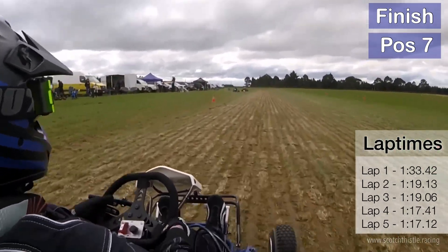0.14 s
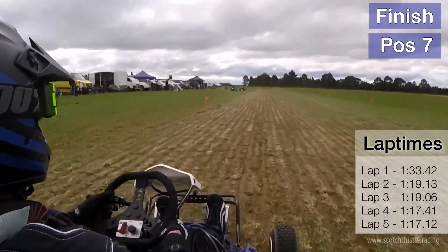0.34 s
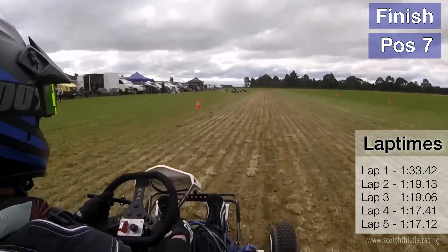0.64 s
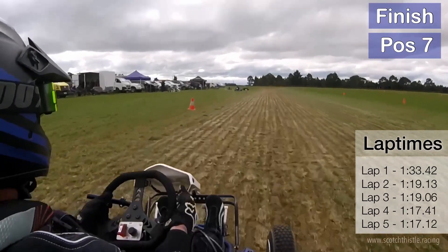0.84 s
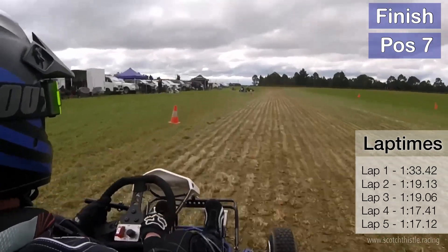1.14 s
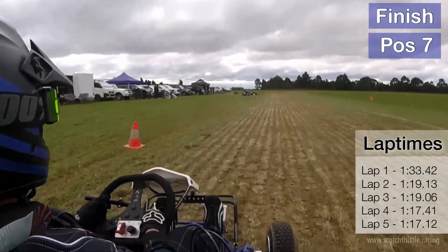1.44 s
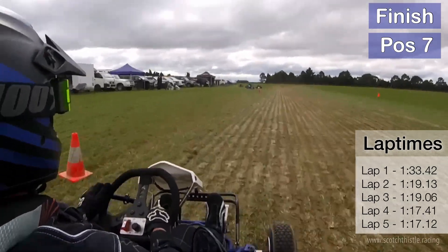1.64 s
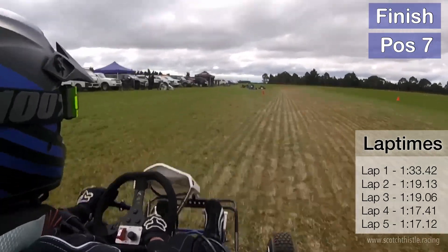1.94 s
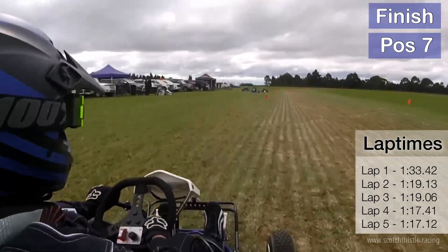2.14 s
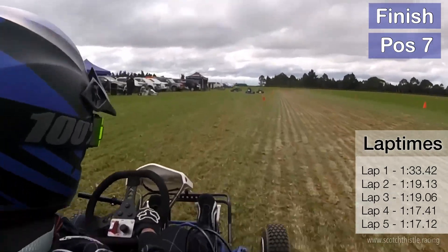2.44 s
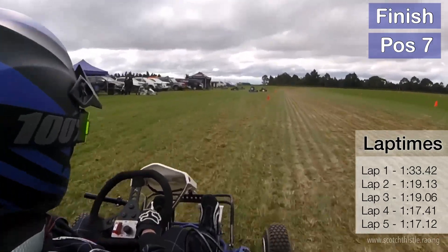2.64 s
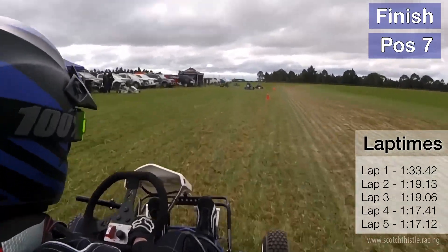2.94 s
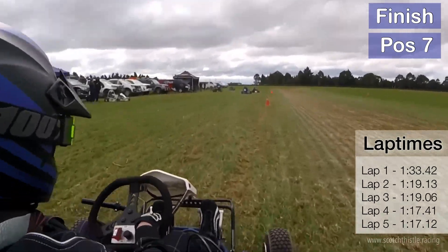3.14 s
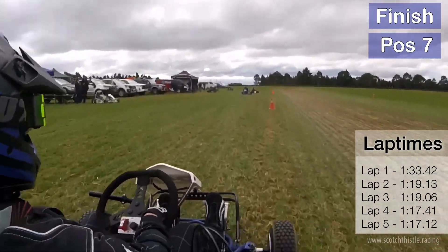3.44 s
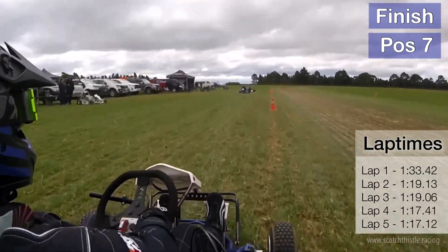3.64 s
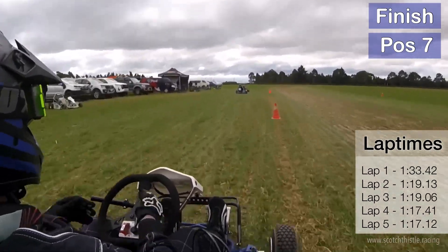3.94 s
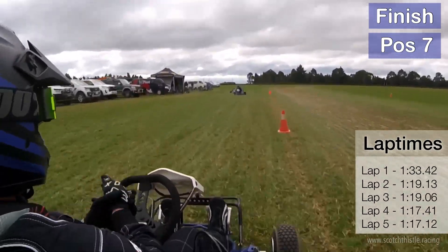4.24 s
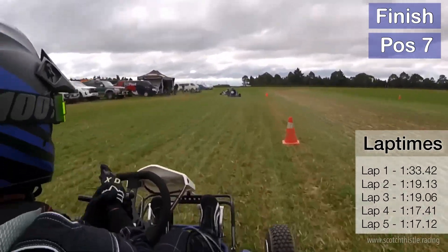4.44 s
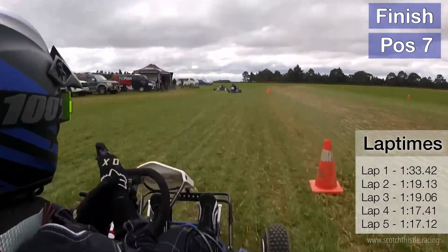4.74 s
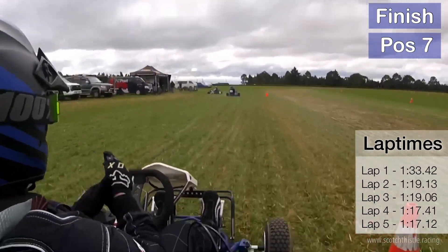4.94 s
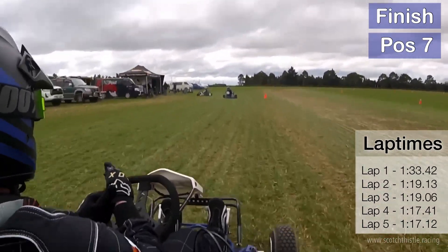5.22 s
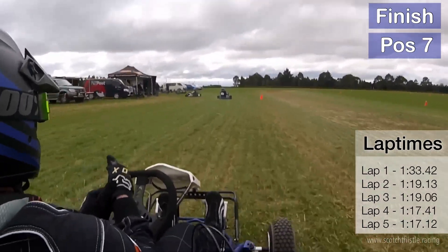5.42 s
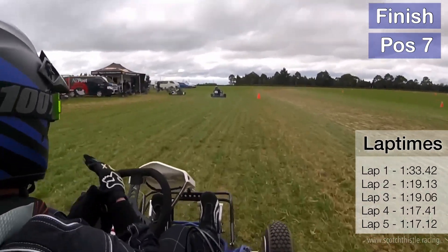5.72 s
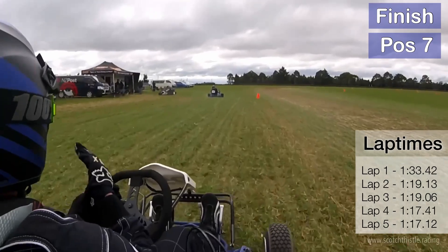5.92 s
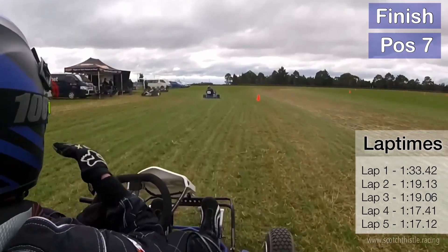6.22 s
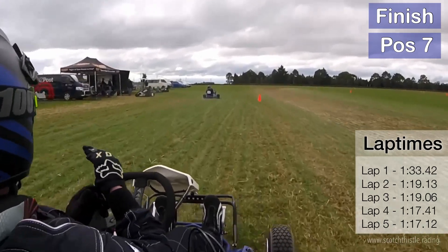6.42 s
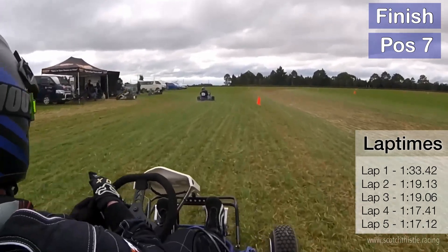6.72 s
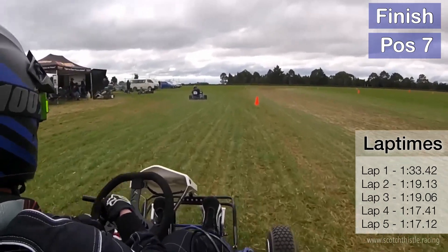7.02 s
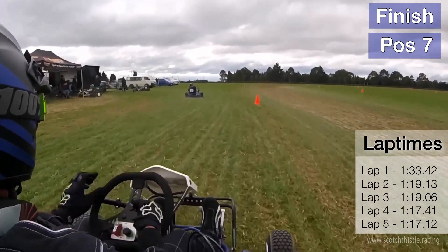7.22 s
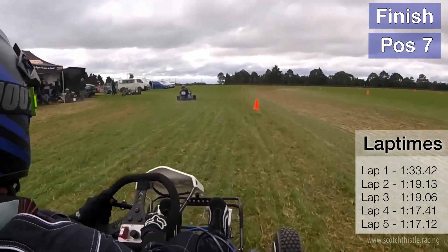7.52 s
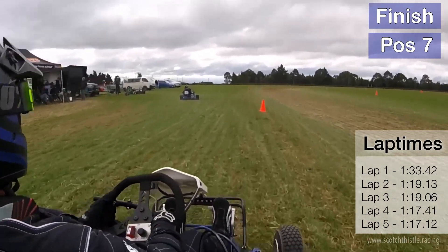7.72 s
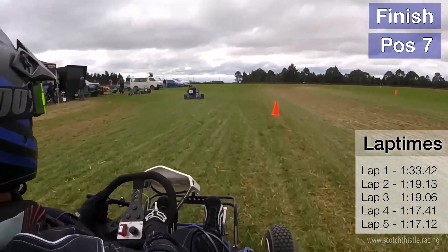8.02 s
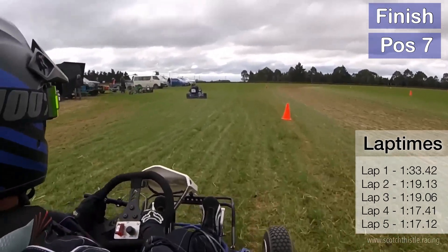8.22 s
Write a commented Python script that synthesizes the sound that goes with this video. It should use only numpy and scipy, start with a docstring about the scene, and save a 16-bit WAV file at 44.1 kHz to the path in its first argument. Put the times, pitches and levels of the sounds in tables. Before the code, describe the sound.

From 0 s a small single-cylinder kart engine runs in a low, coarse drone, close and dry in the open air. Heavy bass shaking throbs with each crank turn; the attached camera mount buzzes rapidly, and metal clatter and running chain fill the middle. Tyres swish faintly through stubble. Revs settle slowly until about 2.2 s, when a cluster of hard frame knocks leads into a quick jump in pitch, peaking at 2.4 s. Short chain scrapes follow at 2.4 and 2.7 s. The drone then snatches and wavers downward, pulsing around 3.5-4.5 s; a wheel thuds through a hollow at 4.7 s. From 5.4 s the load eases and the buzz recedes. By 6-8.4 s a lower, rough idle remains, with uneven bass sway, bright irregular chain clinks, ringing guard taps, chatter and turf rumble.

```python
"""A droning exhaust over mechanical clatter, on a shaking frame: a single-cylinder kart rolls over stubble and grass.
The crank swings the frame as a low sine, and the camera mount buzzes at both ends of each stroke.
The exhaust sums half orders of the crank and noisy puffs; filtered slaps and small contacts make the clatter.
The revs jump once, then sink to a rough idle: the slack chain clinks, its guard chatters and
the wheels rumble over the turf."""
import sys
import numpy as np
from scipy import signal
from scipy.fft import rfft, irfft, next_fast_len
from scipy.io import wavfile
from scipy.ndimage import uniform_filter1d, map_coordinates

SR = 44100
rng = np.random.default_rng(int(sys.argv[2]) if len(sys.argv) > 2 else 0)


def file_out(sig):
    """Save sig as 16-bit WAV at sys.argv[1]."""
    # one column per channel
    cols = np.atleast_2d(sig).T
    # limit, then scale
    lim = np.clip(cols, -1, 1)
    pcm = np.round(lim * 32767).astype(np.int16)
    wavfile.write(sys.argv[1], SR, pcm)


N = 369072
TIME = np.arange(N) / SR  # seconds

# Ground and wheels
# spectrum of the wheels' rumble on turf: (frequency [Hz], relative level [dB])
RUMBLE_SPECTRUM = [(12, -34.5), (26, -10.5), (38, -2), (55, -5.5), (70, -1), (88, 2), (110, -6), (135, -9),
                   (200, -16.5), (500, -43), (2000, -110)]
# spectrum of tyres in stubble: (frequency [Hz], relative level [dB])
SWISH_SPECTRUM = [(800, -6), (2500, 4.5), (3400, -5), (3900, -5.5), (5000, -5.5), (6000, -9), (8000, -20.5),
                  (10000, -29.5)]
# the wheels thud through a hollow: (time [s], length [s], level [dB])
HOLLOW = (4.7, 0.2, -43.5)
# ruts damp the shake and change the swish: (time [s], length [s], shake depth [dB], swish change [dB])
RUTS = [(0.326, .09, 6, 5.5), (0.464, 0.073, 10.5, 6.5), (.67, .055, 8, 1), (2.247, .03, 15.5, -2.5),
        (2.418, 0.093, 6, 1), (2.743, .025, 5, 1), (2.894, 0.055, 6.5, 10), (3.004, 0.031, 8, 8),
        (3.169, 0.047, 7.5, -1), (3.335, .04, 10.5, 3.5), (3.574, 0.083, 6.5, 3), (3.754, 0.058, 2.5, -0.5),
        (4.079, 0.055, 4, 8), (5.131, 0.078, 5, 3)]
# the frame knocks on bumps: (time [s], thump level [dB], ring [Hz])
KNOCKS = [(0.085, -22, 480), (2.1975, -26, 900), (2.2015, -19, 380), (2.2045, -21, 1300),
          (2.2075, -25, 450), (2.2195, -14.5, 640), (4.722, -18.5, 540), (5.581, -20.5, 600),
          (5.893, -23, 600)]
KNOCK_T60_S, CRACK_T60_S, CRACK_DB = 0.0087, 0.013, -14  # thump ring, crack ring, crack against thump

# Chain and its guard
# the chain scrapes as it takes up the drive: (time [s], length [s], level before a common trim [dB])
SCRAPES = [(2.43, 0.19, -32.5), (2.74, 0.086, -32.5)]
# spectrum of a scrape: (frequency [Hz], relative level [dB])
SCRAPE_SPECTRUM = [(500, -53), (1000, -7.5), (1550, -8.5), (1750, -0.5), (1950, -15.5), (3000, -25),
                   (6000, -37), (10000, -63.5)]
# spectrum of the chattering guard: (frequency [Hz], relative level [dB])
GUARD_SPECTRUM = [(500, -53), (1000, -25.5), (1180, 10.5), (1260, -11), (1360, 14), (1450, 1), (1600, 1),
                  (1850, -5.5), (2100, -59), (4000, -100)]
# the slack chain hits its guard: (time [s], peak before CLINK_GAIN_DB [dB], ring [Hz])
CLINKS = [(5.8396, -53, 5430), (5.8975, -51, 5300), (5.9628, -51.5, 4820), (6.1449, -52.5, 5280),
          (6.5071, -45, 5400), (6.55, -49, 5300), (6.6044, -48.5, 5470), (6.7022, -50, 5400),
          (6.8024, -51, 5200), (6.9007, -45, 5200), (6.9531, -48.5, 5440), (7.004, -49.5, 5370),
          (7.0584, -52, 6420), (7.0718, -44.5, 5380), (7.3272, -53, 5120), (7.4255, -48, 5600),
          (7.4374, -48, 5270), (7.5567, -46.5, 5130), (7.5727, -44, 5340), (7.6276, -48.5, 5160),
          (7.8451, -48.5, 5310), (7.9593, -43, 5200), (7.9698, -45, 5170), (8.1494, -49.5, 5330),
          (8.2023, -52, 4930), (8.2631, -45, 5170)]
# spectrum shared by clinks and jostling links: (frequency [Hz], relative level [dB])
CLINK_SPECTRUM = [(1500, -33.5), (4200, -19), (5200, 5), (5900, -3), (7200, -8.5), (8000, -21), (9000, -34)]
CLINK_S, CLINK_GAIN_DB = .0055, 5.5  # time scale of a link's skid; gain of every clink
CLINK_WIDTH_HZ, CLINK_LIFT_DB = 520, 7  # width and height of each clink's own ring
# the loose guard is tapped at idle: (time [s], strike level before the modes' levels [dB])
TAPS = [(6.0092, -37), (6.115, -37), (6.5334, -32.5), (6.8017, -28.5), (6.8366, -35), (6.928, -28.5),
        (6.9886, -32.5), (7.0462, -33), (7.264, -30.5), (7.3451, -30.5), (7.4381, -31), (7.7127, -30.5),
        (7.7443, -28.5)]
# ringing modes of the guard, varied a little at each tap: (frequency [Hz], level [dB], t60 [s])
GUARD_MODES = [(1190, -21.5, 0.032), (1360, -3.5, 0.062), (1420, -6, 0.028), (1850, -11, 0.027),
               (2800, -16, .012)]

# Clatter of the machinery
# resonances of engine block and frame: (frequency [Hz], width [Hz], lift [dB])
BODY = [(426, 110, 4.5), (643, 44, 3.5), (1190, 32, 4.5), (1320, 43, 5.5), (1664, 47, 5.5), (1837, 52, 8.5),
        (2140, 86, 4), (2803, 240, 4), (5216, 530, 13), (6330, 250, 7.5)]
# spectrum of the engine clatter: (frequency [Hz], relative level [dB])
CLATTER_SPECTRUM = [(90, -39.5), (200, -2.5), (330, -6), (450, -3.5), (750, -4.5), (1100, -8), (1600, -21),
                    (2500, -31), (5000, -57.5), (10000, -100)]
# spectrum of the running chain: (frequency [Hz], relative level [dB])
CHAIN_SPECTRUM = [(300, -51.5), (1000, -5), (1400, 1), (1800, 0), (2050, -4.5), (2400, -15), (3000, -12.5),
                  (3400, -22.5), (4500, -24.5), (6000, -32.5), (8000, -36), (10000, -45.5)]
# how hard the running kart rattles: (time [s], level [dB])
RATTLE = [(0, 1.5), (.45, 2), (1.9, 0), (3.1, -1), (3.5, 0.5), (4.5, -1.5), (5.1, -0.5), (5.75, -2.5),
          (6.5, -1.5), (7.6, 1.6), (8.37, 2)]
# brief dips in level: (time [s], length [s], depth [dB])
LULLS = [(5.281, 0.091, 3.5), (5.743, 0.19, 2.5)]
# jolts shake the rattle and the camera mount harder: (time [s], lift [dB])
JOLTS = [(.08, 2.5), (1.3, 3), (2.21, 5), (5.06, 1.5), (5.21, 1), (5.355, 1.5)]
JOLT_S, JOLT_SWING = 0.039, 0.72  # length of a jolt; dB of swing at the mount per dB of jolt
CRUISE_HZ = 82  # crank turns a second at which the level laws are stated
# level laws of four layers: (level at cruising speed [dB], slope [dB per dB of rattle],
# slope [dB per extra crank turn a second], change at idle [dB])
CLATTER_LAW = (-37.5, 1.08, 0.0932, 1)
CHAIN_LAW = (-43, 0.92, 0.1579, 3.5)
SWISH_LAW = (-60, 2, 0.3441, -5)
RUMBLE_LAW = (-39, 0.2, 0.3365, 8)
THROB_AT, FULL_SWING_DB = .4, -22  # share of a turn where the throb peaks; swing that gives full throb
CLATTER_THROB_DB, CHAIN_THROB_DB, IDLE_THROB_DB = 4.2, 2.2, .8  # swell per turn: driving adds to idle's

# Exhaust
# exhaust note: (multiple of the crank speed, level driving [dB], level idling [dB])
NOTE = [(.5, -51, -52.5), (1.5, -49.5, -37.5), (2, -42.5, -41), (2.5, -51.5, -40.5), (3, -46.5, -45.5),
        (3.5, -53.5, -53), (4, -56, -57.5), (4.5, -61, -53.5), (5, -63.5, -66), (6, -56.5, -47.5),
        (7, -58, -52.5)]
# the silencer's chamber resonances: (frequency [Hz], width [Hz], lift [dB])
SILENCER = [(190, 13, 3), (260, 21, 4.5), (307.4, 20, 5.5), (384, 21, 9.5)]
# spectrum of the gas puffs: (frequency [Hz], relative level [dB])
PIPE_SPECTRUM = [(60, -32), (110, -11), (160, 3.5), (230, 1), (300, -1.5), (420, -6), (700, -10),
                 (1500, -17.5), (3000, -48.5), (8000, -110)]
# the drone at twice the crank speed surges and drops as the drive snatches: (time [s], change [dB])
SURGES = [(2.36, -14), (2.48, 5), (2.6, 0), (2.74, 5.5), (3.2, -10), (3.39, 3.5), (3.55, 3), (5.25, -6),
          (5.45, -6)]
SURGE_S = 0.088
# then the drone pulses for a while: (time [s], length [s], pulses a second [Hz], depth [0-1])
LOPE = (3.85, .9, 6.35, .8)
FULL_HZ = 82.1  # below this crank speed the loaded exhaust fades
EXHAUST_DB, FADE_DB_PER_HZ = -0.05, 0.3
NOTE_WAVER_DB, CRANK_WAVER = 1.4, .002  # unsteadiness of each order; of the crank speed (share)

# Camera mount
# spectrum of a tick of the mount, also of a knock's crack: (frequency [Hz], relative level [dB])
TICK_SPECTRUM = [(120, -26), (300, -8.5), (550, 3), (1000, -2), (1800, -2.5), (3600, -17), (5500, -8),
                 (7500, -19.5), (10000, -33)]
# resonances of the camera case: (frequency [Hz], width [Hz], lift [dB])
CASE = [(547, 96, 17.5), (1690, 120, 15.5), (1820, 70, 10.5), (2100, 110, 9), (2250, 350, 11)]
# the mount answers best near this crank speed: (speed [turns a second], width [Hz])
MOUNT = (78.2, 33)
TICK_T60_S, TICK_UNEVEN_DB = .003, 3.2  # chatter of one tick; scatter of tick sizes
TICK_STOP_DB = -23  # hardest blow the plastic passes
CLICK_DB = -5.5  # hard first contact of a tick, against its chatter
STROKE_BIAS_DB, STROKE_SCATTER = .6, .03  # one end is struck harder; timing play (share of a stroke)

# Crank and frame
# crank speed: (time [s], speed [turns a second])
CRANK = [(0.0, 98.1), (0.11, 87.1), (0.25, 89.1), (0.6, 87.0), (1.1, 85.3), (1.55, 82.7), (1.72, 83.3),
         (1.88, 78.1), (2.17, 80.1), (2.33, 101.4), (2.4, 104.4), (2.52, 94.5), (2.72, 97.3), (2.85, 87.0),
         (3.05, 90.3), (3.2, 88.0), (3.33, 92.8), (3.45, 86.4), (3.55, 88.5), (3.65, 84.2), (3.79, 86.1),
         (4.1, 84.4), (4.35, 81.8), (4.55, 81.2), (4.8, 79.1), (5.05, 78.9), (5.3, 76.2), (5.5, 76.2),
         (5.8, 73.3), (6.2, 72.0), (6.6, 71.4), (6.9, 69.8), (7.3, 68.7), (7.8, 69.0), (8.37, 69.9)]
# engine load: (time [s], load [0 idle to 1 driving])
LOAD = [(0, 0.99), (5.4, 0.99), (5.7, 0.82), (6.1, 0.41), (7, 0.15), (8.37, 0.047)]
# a brief swell: (time [s], length [s], more exhaust [dB], more shake [dB])
BRIEF_SWELL = (3.3, 0.22, 1.1, 2.5)
# the shake peaks as the crank crosses the frame's resonance: (speed [turns a second], width [Hz], lift [dB])
FRAME = (77.6, 13.9, 4.16)
SHAKE_DB, SHAKE_WAVER_DB = -25.8, .85  # swing away from resonance; its unsteadiness
SWAY_DB, SWAY_WAVER_DB = -36, 2.5  # free sway at idle; its unsteadiness
# the low sway swells and fades at idle, as in beating: (time [s], level [dB], pitch [Hz])
SWAY_SWELLS = [(5.86, -31, 73), (6.21, -33, 75.17), (6.57, -36, 75.2), (6.96, -27.5, 79.75),
               (7.08, -40, 79.7), (7.21, -33, 88.1), (7.39, -28, 87.9), (7.7, -29.5, 81.9),
               (7.99, -29, 86.46), (8.1, -34, 86.4), (8.27, -31, 81.8)]
SWAY_SWELL_S = 0.062

TOP_HZ = 10150  # the camera's band limit


def amp(db):
    """Decibels to gain."""
    return 10 ** (np.asarray(db) / 20)


def unit(x):
    """Scale to rms 1."""
    return x / np.sqrt(np.mean(x ** 2) + 1e-20)


def noise():
    """White noise for the whole scene."""
    return rng.standard_normal(N)


def curves(rows):
    """One value per sample for each column after the time."""
    s, *cols = np.transpose(rows)
    return [np.interp(TIME, s, c) for c in cols]


def wobble(rate):
    """A smooth random curve, rate knots a second."""
    knots = rng.standard_normal(int(N * rate / SR) + 4)
    return map_coordinates(knots, [TIME * rate])


def hump(s, length):
    """A smooth rise to 1 and fall around a moment."""
    return np.exp(-(2 * (TIME - s) / length) ** 2)


def humps(rows, length):
    """Brief humps of dB at (time [s], height [dB])."""
    return sum(db * hump(s, length) for s, db in rows)


def swells(rows):
    """Smooth humps of gain at (time [s], length [s], level [dB])."""
    return sum(amp(db) * hump(s, length) for s, length, db in rows)


def resonance(hz, centre, width):
    """A peak of height 1, as wide as stated at half its height."""
    return 1 / (1 + (2 * (hz - centre) / width) ** 2)


def colour(x, points, peaks=(), size=16384):
    """Minimum-phase filter of energy 1 through (frequency, dB) points, raised at each resonance."""
    hz = np.fft.rfftfreq(size, 1 / SR)
    f, level = np.transpose(points)
    db = np.interp(np.log(hz + 1), np.log(f), level)
    for centre, width, lift in peaks:
        db = db + lift * resonance(hz, centre, width)
    # folding the cepstrum makes the filter causal
    cepstrum = irfft(np.log(amp(db)))
    cepstrum[1:size // 2] *= 2
    cepstrum[size // 2 + 1:] = 0
    ring = irfft(np.exp(rfft(cepstrum)))
    return signal.fftconvolve(x, ring / np.linalg.norm(ring))[:N]


def beats(cycles):
    """A unit impulse each time the count of cycles passes a whole number."""
    whole = np.floor(cycles)
    return np.diff(whole, prepend=whole[0])


def scatter(cycles, spread_db):
    """A new random gain for each cycle."""
    gains = amp(spread_db * noise())
    return gains[np.floor(cycles).astype(int)]


def decay(t, t60):
    """Exponential fall of 60 dB in t60 seconds."""
    return np.exp(-np.log(1000) * t / t60)


def bursts(rows, t60):
    """Short dying puffs of noise at (time [s], level [dB])."""
    out, t = np.zeros(N + SR), np.arange(SR // 4) / SR
    for s, db in rows:
        out[round(s * SR):][:len(t)] += amp(db) * decay(t, t60) * rng.standard_normal(len(t))
    return out[:N]


def ringing(hz, t60):
    """A struck mode: a sine that dies away."""
    t = np.arange(SR // 4) / SR
    return np.sin(2 * np.pi * hz * t) * decay(t, t60)


def lulls():
    """Depth in dB of the brief dips in level."""
    return sum(depth * hump(s, length) for s, length, depth in LULLS)


def ruts():
    """Two curves in dB: how much the ruts damp the shake, and how much they change the swish."""
    return sum(np.outer([depth_db, swish_db], hump(s, length)) for s, length, depth_db, swish_db in RUTS)


def level_db(law, speed, load):
    """A layer's level follows the rattle, the crank speed and the slackening drive."""
    cruise_db, per_rattle, per_hz, slack_db = law
    rattle_db = curves(RATTLE)[0] + humps(JOLTS, JOLT_S) - lulls()
    return cruise_db + per_rattle * rattle_db + per_hz * (speed - CRUISE_HZ) + slack_db * (1 - load)


def knocks():
    """Each knock on the frame is a dull thump of a few cycles with a short crack."""
    out = np.zeros(N + SR)
    for s, db, ring_hz in KNOCKS:
        thump = amp(db) * ringing(ring_hz, KNOCK_T60_S)
        out[round(s * SR):][:len(thump)] += thump
    crack = colour(bursts([(s, db) for s, db, _ in KNOCKS], CRACK_T60_S), TICK_SPECTRUM, CASE)
    return out[:N] + amp(CRACK_DB) * crack


def ground(speed, load):
    """Wheels swish through stubble and rumble over turf as filtered noise; the frame now and then knocks."""
    jolts = amp(level_db(RUMBLE_LAW, speed, load)) + swells([HOLLOW])
    rumble = jolts * amp(1.8 * wobble(10)) * unit(colour(noise(), RUMBLE_SPECTRUM))
    swish_db = level_db(SWISH_LAW, speed, load) + ruts()[1]
    stalks = amp(5.6 * wobble(600)) * noise()  # fast flicker roughens the noise
    swish = amp(swish_db + 2.3 * wobble(16)) * unit(colour(stalks, SWISH_SPECTRUM))
    return rumble + swish + knocks()


def clinks():
    """A slack link skids along the guard for a moment; each spot rings at its own pitch."""
    out, t = np.zeros(N + SR), np.arange(SR // 25) / SR
    contact = np.sqrt(t / CLINK_S) * np.exp(-(t / CLINK_S) ** 2)
    for s, db, ring_hz in CLINKS:
        skid = contact * rng.standard_normal(len(t))
        ring = colour(skid, CLINK_SPECTRUM, [(ring_hz, CLINK_WIDTH_HZ, CLINK_LIFT_DB)], size=2048)
        out[round(s * SR):][:len(ring)] += amp(db + CLINK_GAIN_DB) * ring / np.abs(ring).max()
    return out[:N]


def taps():
    """Each tap rings the guard's modes, in a slightly different mix and pitch."""
    out = np.zeros(N + SR)
    for s, db in TAPS:
        for hz, level, t60 in GUARD_MODES:
            gain = amp(db + level + rng.normal(0, 1.5))
            mode = gain * ringing(hz * rng.normal(1, .012), t60)
            out[round(s * SR):][:len(mode)] += mode
    return out[:N]


def chain_noises(turns, load):
    """The chain scrapes taking up the drive; when slack it jingles, clinks and keeps its guard ringing."""
    scrape = amp(-2.5) * swells(SCRAPES) * unit(colour(noise(), SCRAPE_SPECTRUM))
    guard = (1 - load) * amp(-47 + 3.0 * wobble(15)) * unit(colour(noise(), GUARD_SPECTRUM))
    jingle = amp(3.5 * wobble(110) - 3 * np.sin(2 * np.pi * turns)) * noise()  # links jostle with each turn
    links = (1 - load) * amp(-68) * colour(jingle, CLINK_SPECTRUM, [(5180, 400, 12)])
    return scrape + guard + links + clinks() + taps()


def machinery(turns, spectrum, throb_depth, fire_db, slap_db, uneven_db, flutter_db):
    """Piston slaps and a rush of small contacts, swelling with each turn and each firing, ring the metal."""
    angle = 2 * np.pi * (turns - THROB_AT)
    throb = amp(throb_depth * np.cos(angle) + fire_db * np.cos(angle / 2))
    throb = throb / np.sqrt(uniform_filter1d(throb ** 2, size=4096))  # keep the average level even
    rush = unit(throb * scatter(2 * turns, uneven_db) * noise())
    slaps = unit(beats(turns - THROB_AT) * throb * scatter(turns + 1 - THROB_AT, uneven_db))
    rung = unit(colour(rush + amp(slap_db) * slaps, spectrum, BODY))
    return amp(flutter_db * wobble(22)) * rung


def drone_gain():
    """The drone surges with the snatching drive, then pulses evenly."""
    s, length, rate, depth = LOPE
    pulse = 1 + depth * hump(s, length) * np.cos(2 * np.pi * rate * (TIME - s))
    return amp(humps(SURGES, SURGE_S)) * pulse


def exhaust_level_db(speed, load):
    """The exhaust fades as the loaded engine slows, and swells briefly once."""
    s, length, louder_db, _ = BRIEF_SWELL
    fade_db = FADE_DB_PER_HZ * load * np.maximum(FULL_HZ - speed, 0)
    return EXHAUST_DB - fade_db + louder_db * hump(s, length) - lulls()


def exhaust(turns, speed, load, puff_db, uneven_db):
    """One firing every second turn: a note of half orders and a ragged puff of gas."""
    note = np.zeros(N)
    for order, drive_db, idle_db in NOTE:
        # an order swells as it crosses a resonance
        boom_db = sum(lift * resonance(order * speed, centre, width) for centre, width, lift in SILENCER)
        level = amp(idle_db + load * (drive_db - idle_db) + boom_db + NOTE_WAVER_DB * wobble(8))
        if order == 2:
            level = level * drone_gain()
        note += level * np.cos(2 * np.pi * order * turns - order ** 2)  # the silencer delays high orders more
    gas = np.exp(-4 * (turns / 2 % 1)) * scatter(turns / 2, uneven_db) * noise()
    return np.sqrt(2) * note + amp(puff_db) * unit(colour(gas, PIPE_SPECTRUM))


def mount_buzz(turns, speed, swing, play_db, gain_db):
    """When the swing exceeds its play, the camera mount chatters briefly at both ends of the stroke."""
    answer = resonance(speed, *MOUNT)
    jolted = answer * swing * amp(JOLT_SWING * humps(JOLTS, JOLT_S))
    excess = np.maximum(jolted - amp(play_db), 0)
    strokes = 2 * turns + .42 + STROKE_SCATTER * wobble(150)
    ends = amp(STROKE_BIAS_DB * np.sin(2 * np.pi * turns))
    blows = beats(strokes) * scatter(strokes, TICK_UNEVEN_DB) * excess * ends
    cushioned = amp(TICK_STOP_DB) * np.tanh(blows / amp(TICK_STOP_DB))
    keep = decay(1 / SR, TICK_T60_S)  # share of the chatter left after one sample
    chatter = signal.lfilter([np.sqrt(1 - keep ** 2)], [1, -keep], cushioned) * noise()
    return amp(gain_db) * colour(chatter + amp(CLICK_DB) * cushioned, TICK_SPECTRUM, CASE)


def frame_swing(speed):
    """The frame swings widest near its resonance, more in one brief swell and less in a rut."""
    centre, width, lift = FRAME
    s, length, _, wider_db = BRIEF_SWELL
    drive_db = lift * resonance(speed, centre, width) + wider_db * hump(s, length)
    return amp(SHAKE_DB + drive_db - ruts()[0] - lulls() + SHAKE_WAVER_DB * wobble(24))


def shake(turns, swing, load, idle_db, wander_hz):
    """Under load the piston swings the frame once a turn; at idle it mostly sways at its own drifting pitch."""
    forced = swing * amp(idle_db * (1 - load)) * np.sin(2 * np.pi * turns)
    sway_swells = swells([(s, SWAY_SWELL_S, db) for s, db, _ in SWAY_SWELLS])
    sway = (1 - load) * amp(SWAY_DB + SWAY_WAVER_DB * wobble(18)) + sway_swells
    _, sway_hz = curves(SWAY_SWELLS)
    free = sway * np.sin(2 * np.pi * np.cumsum(sway_hz + wander_hz * wobble(18)) / SR)
    return np.sqrt(2) * (forced + free)


def scene():
    """Shake, buzz, exhaust and machinery share one crank; chain noises and ground join them."""
    speed, = curves(CRANK)
    load = np.clip(curves(LOAD)[0], 0, 1)
    turns = np.cumsum(speed * (1 + CRANK_WAVER * wobble(25))) / SR
    swing = frame_swing(speed)
    shaking = load * np.minimum(swing / amp(FULL_SWING_DB), 1) ** 2  # the wider the swing, the deeper the throb
    jostle_db = .5 * wobble(11)  # uneven ground moves clatter and chain together

    # slap_db: regular piston slaps against the rush of small contacts
    chain = machinery(turns, CHAIN_SPECTRUM, IDLE_THROB_DB + CHAIN_THROB_DB * shaking,
                      fire_db=0.5, slap_db=-14, uneven_db=1.48, flutter_db=1.0)
    chain = amp(level_db(CHAIN_LAW, speed, load) + jostle_db) * chain
    clatter = machinery(turns, CLATTER_SPECTRUM, IDLE_THROB_DB + CLATTER_THROB_DB * shaking,
                        fire_db=-0.5, slap_db=-9.5, uneven_db=0.77, flutter_db=0.9)
    clatter = amp(level_db(CLATTER_LAW, speed, load) + jostle_db) * clatter
    pipe = amp(exhaust_level_db(speed, load)) * exhaust(turns, speed, load, puff_db=-46.0, uneven_db=3.5)
    buzz = mount_buzz(turns, speed, swing * load, play_db=-27.0, gain_db=6.0)
    frame = shake(turns, swing, load, idle_db=-18.0, wander_hz=3.46)
    mix = ground(speed, load) + chain_noises(turns, load) + chain + clatter + pipe + buzz + frame
    return mix[None]


def record(dry):
    """The camera keeps nothing above its band limit."""
    size = next_fast_len(N + SR // 2)
    kept = np.fft.rfftfreq(size, 1 / SR) < TOP_HZ
    return irfft(rfft(dry, size) * kept, size)[..., :N]


dry = scene()
out = record(dry)
file_out(out)
```